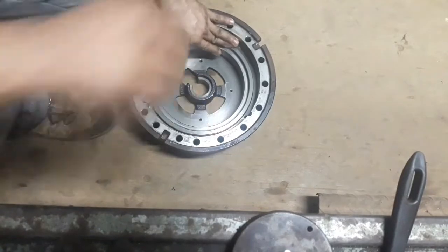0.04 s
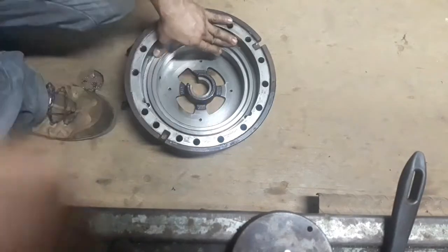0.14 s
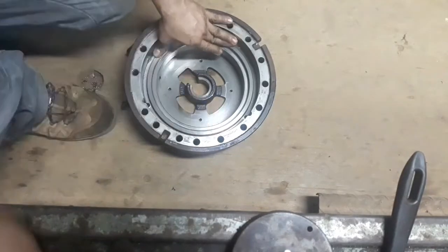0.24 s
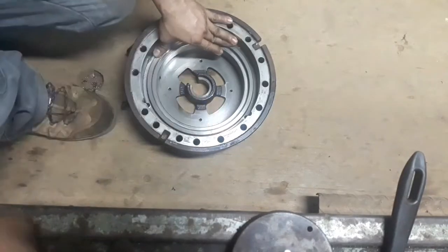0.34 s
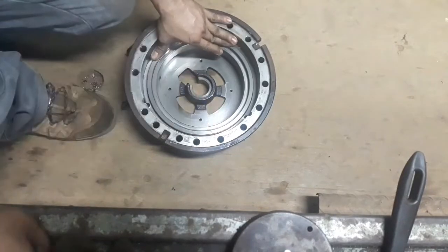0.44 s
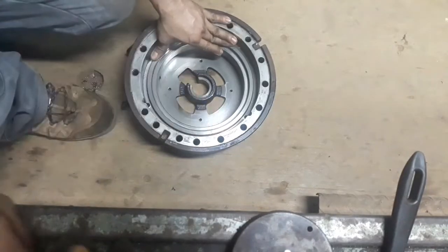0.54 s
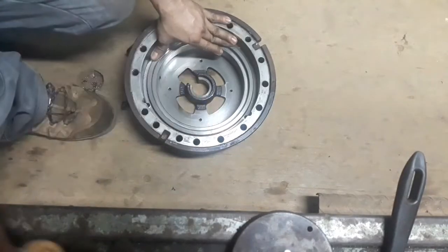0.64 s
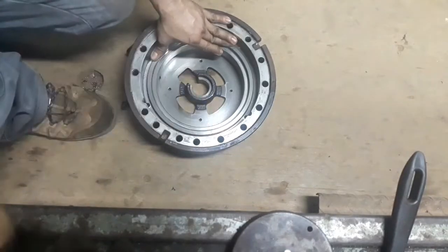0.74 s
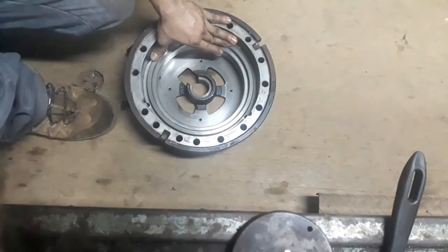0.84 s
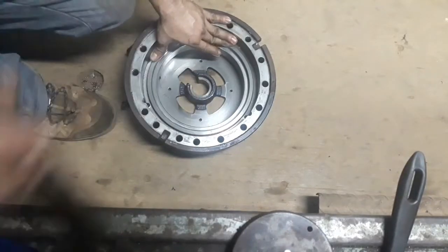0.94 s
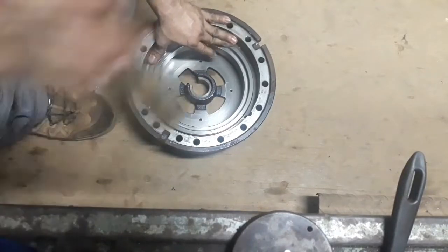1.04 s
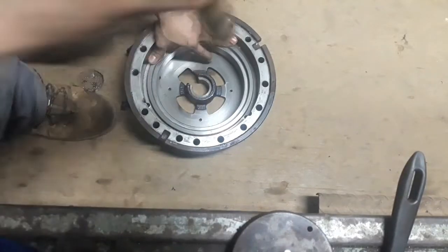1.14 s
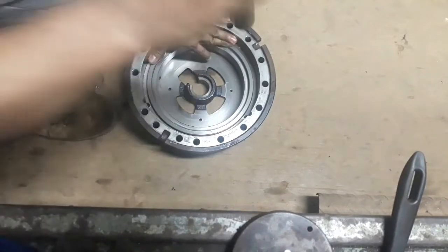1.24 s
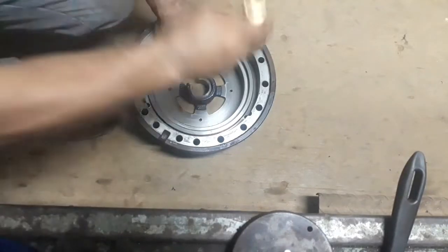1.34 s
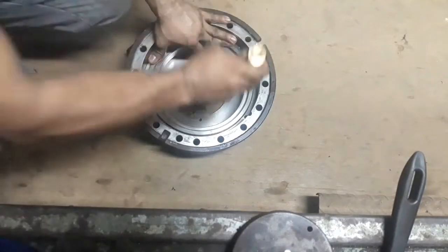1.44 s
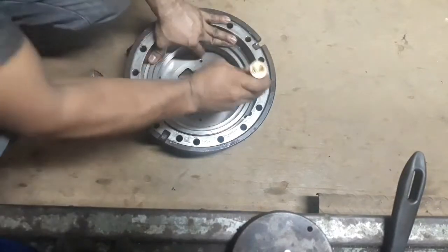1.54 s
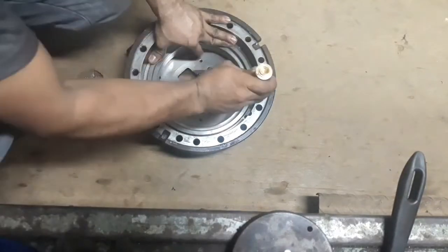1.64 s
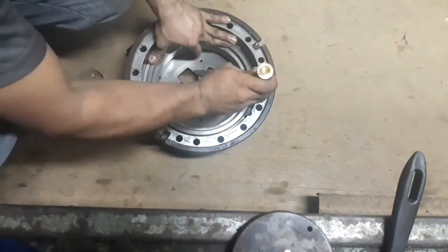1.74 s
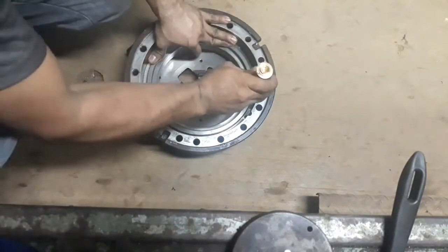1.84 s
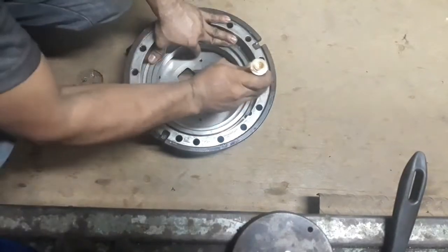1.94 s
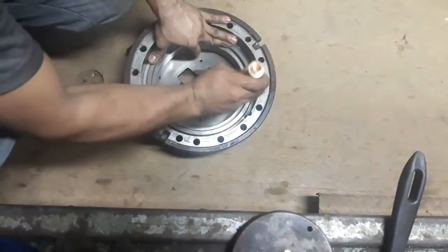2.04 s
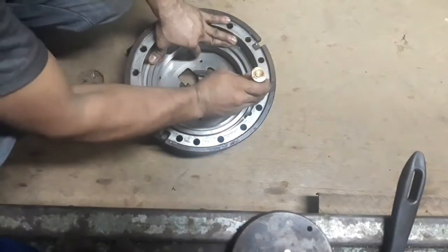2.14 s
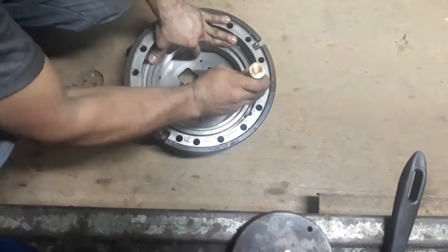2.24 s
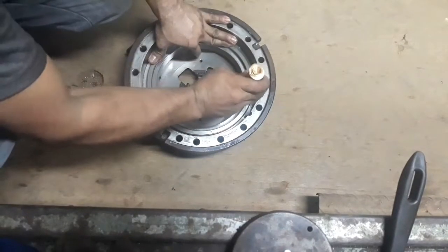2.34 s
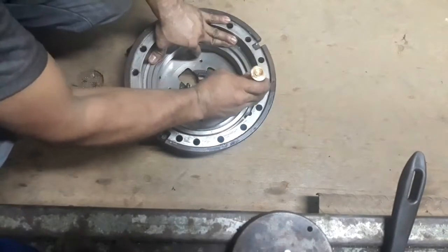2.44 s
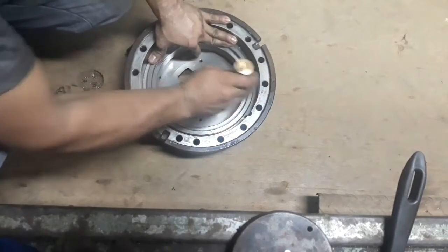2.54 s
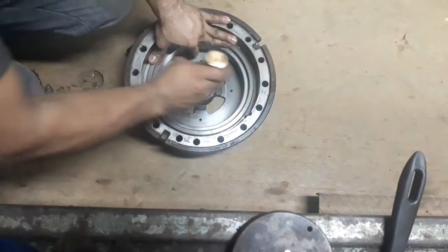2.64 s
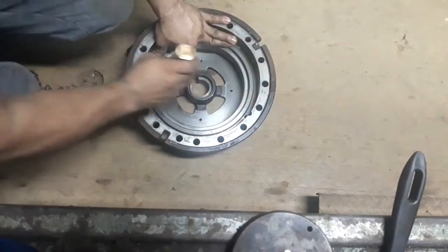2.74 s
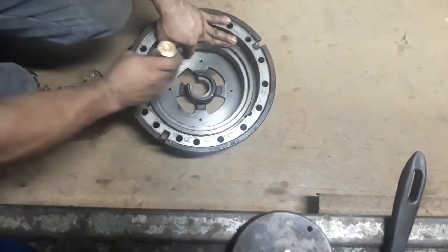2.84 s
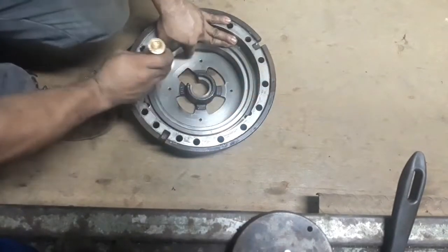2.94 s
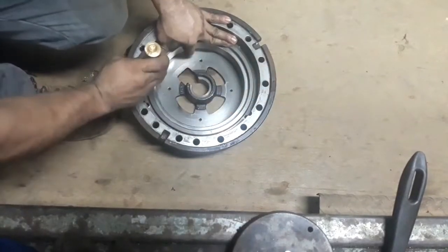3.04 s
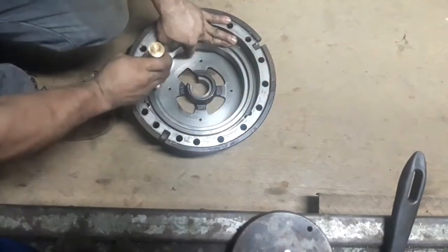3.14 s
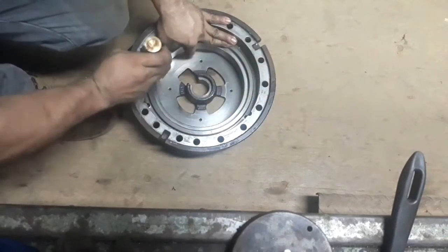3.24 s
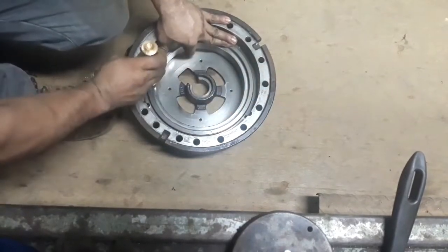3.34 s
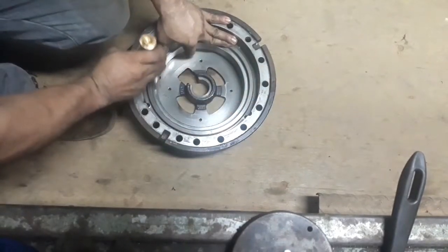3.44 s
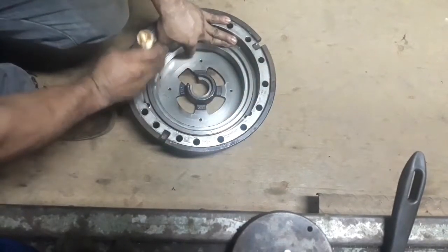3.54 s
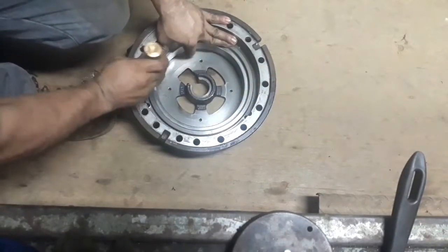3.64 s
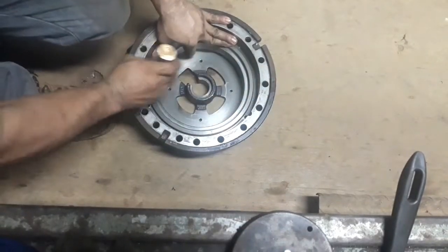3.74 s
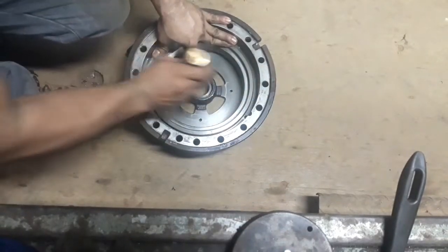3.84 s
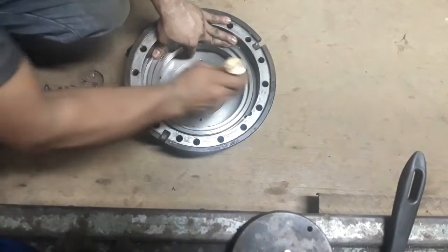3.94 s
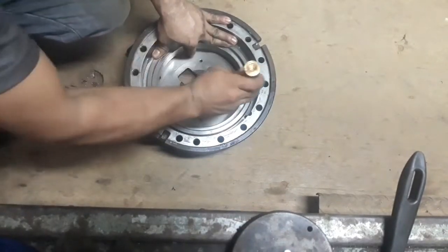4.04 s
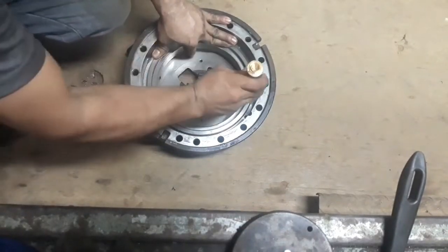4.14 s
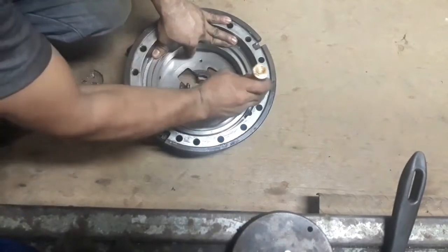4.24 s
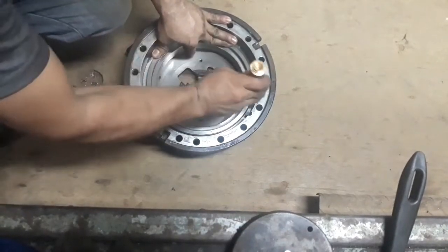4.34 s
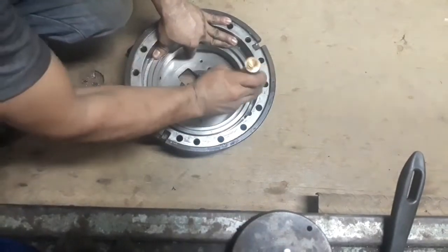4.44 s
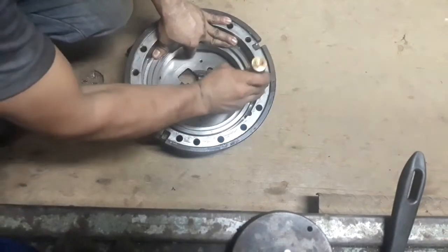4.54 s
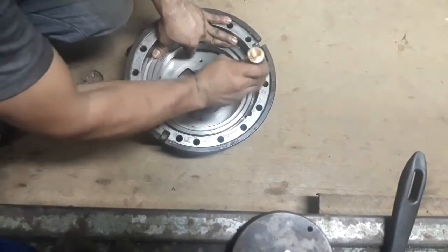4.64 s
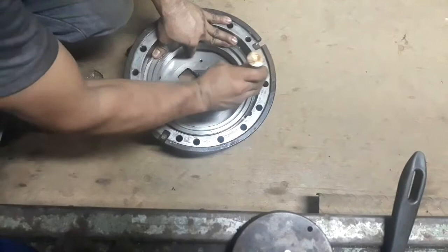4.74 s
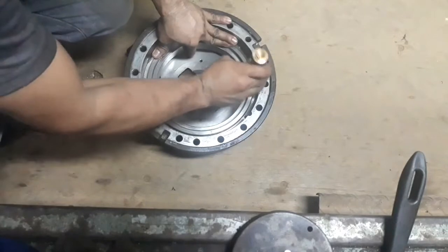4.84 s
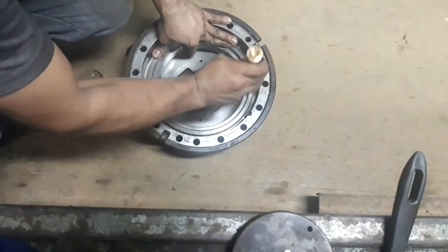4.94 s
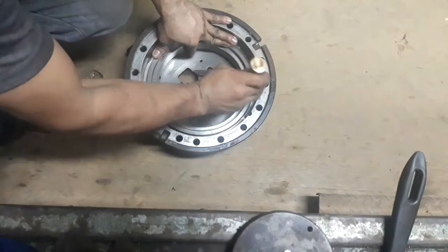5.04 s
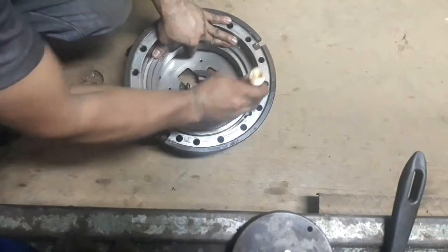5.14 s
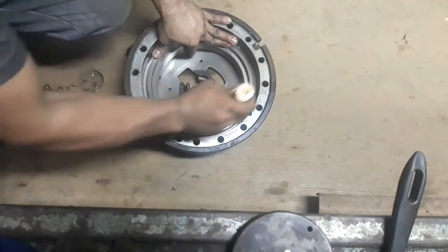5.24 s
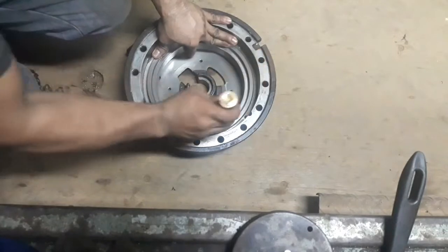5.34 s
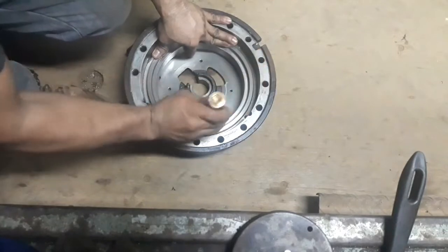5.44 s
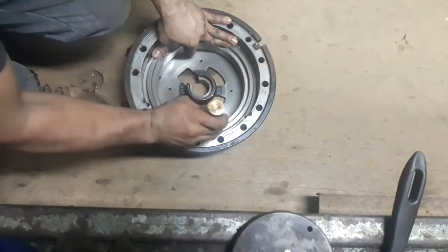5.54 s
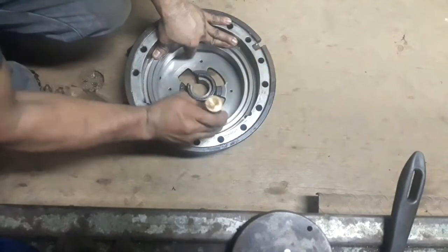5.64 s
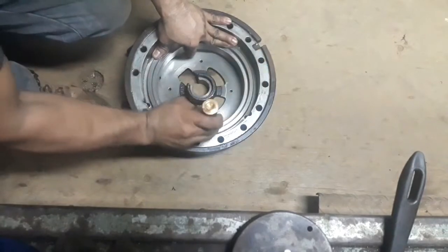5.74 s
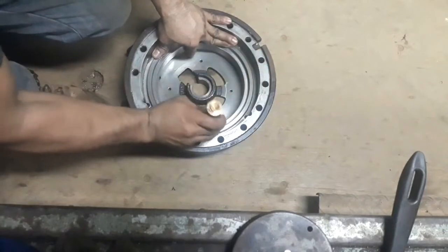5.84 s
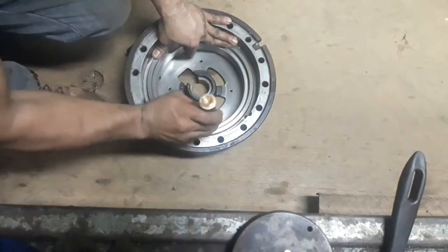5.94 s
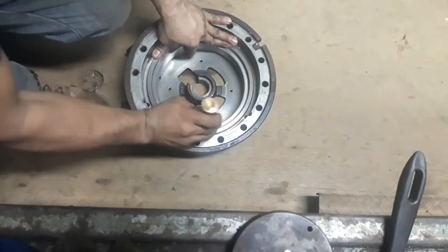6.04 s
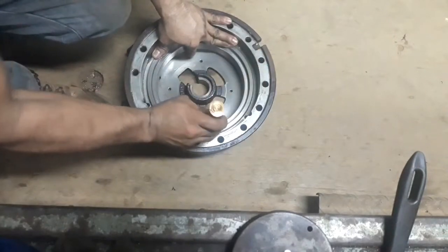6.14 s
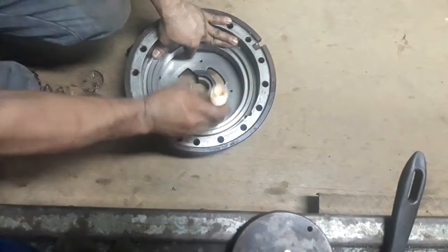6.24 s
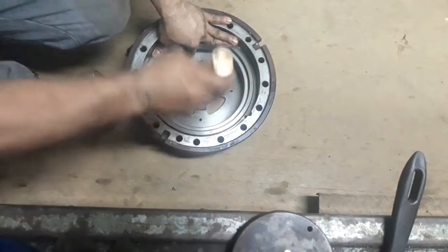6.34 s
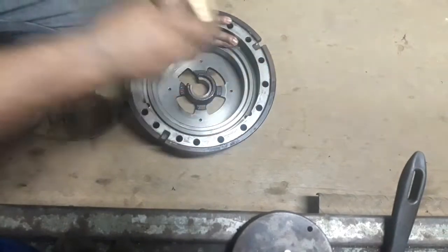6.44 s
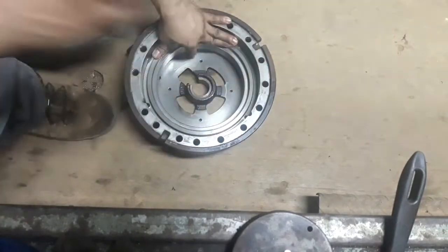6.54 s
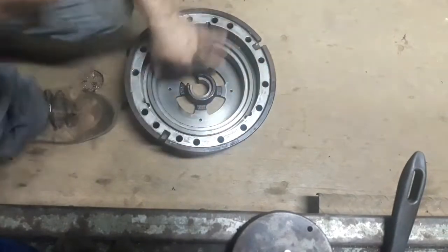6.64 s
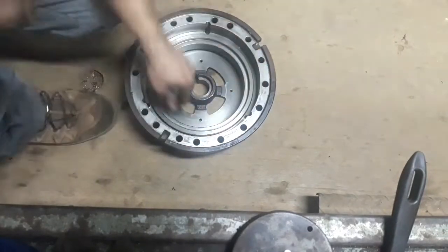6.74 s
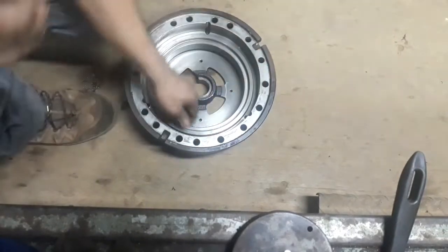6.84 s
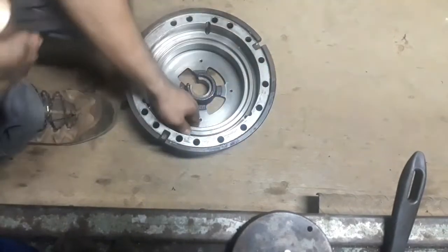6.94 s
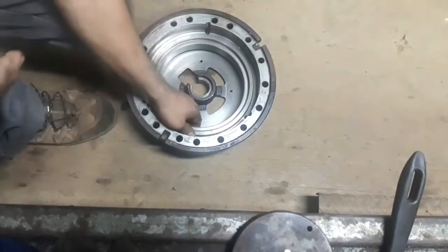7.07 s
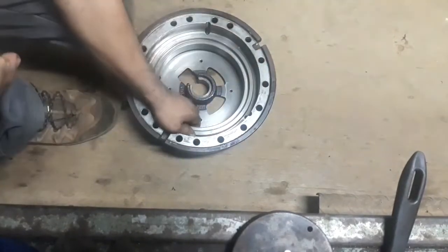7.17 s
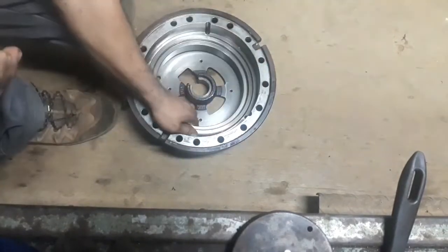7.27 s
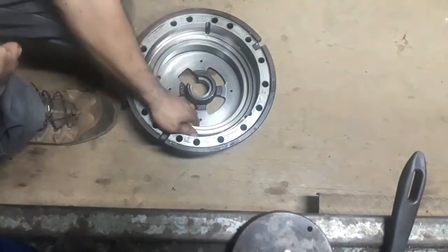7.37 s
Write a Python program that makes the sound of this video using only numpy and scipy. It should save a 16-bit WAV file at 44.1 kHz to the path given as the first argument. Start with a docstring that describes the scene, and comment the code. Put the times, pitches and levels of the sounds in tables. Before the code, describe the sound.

A steady rush of air with a low motor hum opens in a workshop. A small hammer touches a steel wheel softly, then gives two strong, sharp clanks, three more at another spot and a run of lighter taps. Each has a very short ring and a dull thud from the board underneath, with brief room echoes. The fan noise sinks during the tapping and swells back at the end with a faint hand scrape.

```python
"""Sharp clanks with short rings and dull thuds are heard over a rushing, humming fan.
A small brass-headed hammer taps round the rim of a steel wheel that one hand holds down on plywood.
Each tap sums a coloured noise burst, damped modes of the steel and slow modes of the board, with brief echoes.
The fan is coloured noise with wavering sines; it sinks during the tapping and swells back at the end,
as a hand rubs over the wheel with a scrape of uneven noise."""
import sys
import numpy as np
from scipy import signal
from scipy.fft import rfft, irfft
from scipy.io import wavfile
from scipy.ndimage import uniform_filter1d, minimum_filter1d

SR = 44100
rng = np.random.default_rng(int(sys.argv[2]) if len(sys.argv) > 2 else 0)


def master(y):
    """Save y as 16-bit WAV."""
    cut = np.clip(np.atleast_2d(y).T, -1, 1)
    pcm = np.round(cut * 32767)  # scale
    wavfile.write(sys.argv[1], SR, pcm.astype(np.int16))


N = 326594  # length in samples
BLOW_S = 0.5
AGE = np.arange(int(BLOW_S * SR)) / SR  # seconds since a blow

# main rings of the wheel (low, singing, high, top), each a cluster of three close modes:
# pitch_hz, spacing_hz, t60_s
MAIN_RINGS = [(1029.4, 52, 0.076), (3026, 87, 0.072), (4315, 58, 0.092), (7510, 42, 0.039)]
# answer of the wheel at each spot on its rim, levels re the strength, rings before the contact's lift:
# low_ring_db, high_ring_db, top_ring_db, knock_db, favoured_hz, top_treble_db, boom_hz
SPOT_ANSWERS = {"right": (-7.5, -19, -9.5, -13, 1540, -5.5, 170),
                "left": (-9.5, -8.5, -17, -4, 1790, -4, 186),
                "front": (-10, -10, -17.5, -11, 1906, -5.5, 165.5)}


def hammer():
    """Superposition: the soft touch and all taps add up, each from its own start."""
    # blows of the hammer, ring and boom re the strength:
    # start_s, spot, strength_db, contact_brightness_db, singing_ring_db, boom_db, favoured_hz
    taps = [(2.1132, "right", -28, -1.5, -8, -9, 3400), (2.401, "right", -32.5, 4, -25, -11.5, 2660),
            (3.049, "left", -37, -2.5, -5, -4.5, 2800), (3.3463, "left", -31.5, 1.5, -8, -4, 1600),
            (3.6283, "left", -31.5, 4, -22, -4, 2000), (4.2528, "right", -43, -5, -7, -14, 2700),
            (4.5284, "right", -40.5, 2.5, -1.5, -7, 4100), (4.775, "right", -36.5, 8.5, -0.5, -7, 2240),
            (5.0415, "right", -36.5, 8.5, 1, -6, 2580), (5.554, "front", -39.5, 3.5, -6, -11.5, 3560),
            (5.8062, "front", -36, 6, -5, -6, 5050), (6.0639, "front", -36.5, 2, -8, -3, 2500)]
    # the hammer first touches down softly: start_s, low_ring_db, singing_ring_db, boom_db, knock_db
    first_touch = (1.7363, -33, -50, -38.5, -35.5)
    blows = [(first_touch[0], touch(*first_touch[1:]))]
    blows += [(start_s, tap(*blow)) for start_s, *blow in taps]
    out = np.zeros(N + len(AGE))
    for start_s, sound in blows:
        start = int(start_s * SR)
        out[start:start + len(AGE)] += sound
    return out[:N]


def tap(spot, strength_db, bright_db, singing_db, boom_db, favoured_hz):
    """Modal excitation: clank, rings and thud scale with the strength; the spot sets their balance."""
    low_db, high_db, top_db, knock_db, spot_hz, treble_db, boom_hz = SPOT_ANSWERS[spot]
    echoes = room()
    steel = contact(clank((spot_hz, favoured_hz)), bright_db, treble_db)
    tail_db = -10 + 0.36 * bright_db  # a harder contact leaves more echoes
    steel = level(in_room(steel, echoes, tail_db), 3.5)
    ring_levels = (low_db, singing_db, high_db, top_db)
    rings = sum(main_ring(mode, echoes, db) for mode, db in zip(MAIN_RINGS, ring_levels))
    rings = contact(rings, bright_db, treble_db)
    return undb(strength_db) * (steel + rings + thud(boom_db, boom_hz, knock_db))


def touch(low_db, singing_db, boom_db, knock_db):
    """Low-pass excitation: a soft contact at the right wakes only the two lower rings and the board."""
    echoes = room()
    boom_hz = SPOT_ANSWERS["right"][-1]
    low = main_ring(MAIN_RINGS[0], echoes, low_db)
    singing = main_ring(MAIN_RINGS[1], echoes, singing_db)
    return low + singing + thud(boom_db, boom_hz, knock_db)


def clank(favoured_hz):
    """High modal density: a crack spreads into crowded modes, of which spot and blow favour some."""
    # spectrum of the crowded short-lived modes: freq_hz, density_db (per Hz, relative)
    crowd_spectrum = [(60, -40), (400, -11), (780, -5.5), (1250, -1), (1700, 1), (2800, 4), (3600, -2),
                      (5200, -4.5), (6800, -12), (8200, -12.5), (9600, -21.5), (15500, -24.5)]
    # weaker distinct modes of the wheel and hammer head: pitch_hz, level_db (relative), t60_s
    steel_modes = [(1500, -8, 0.088), (1610, -2, 0.059), (1746, 3, 0.084), (1886, 5, 0.088),
                   (2140, -24, 0.12), (2242, 3, 0.17), (2530, 1, 0.22), (2650, -6, 0.24), (3060, 4, 0.17),
                   (3500, -10, .12), (3670, -17, .12), (3940, -7, 0.24), (5300, -16, 0.12),
                   (5370, -6, 0.23), (5700, -6, 0.12), (6230, 6, 0.064), (6660, -24, 0.13),
                   (7900, -0.5, 0.13), (9100, -17, 0.15), (9580, -16, 0.12), (11000, -18, 0.13),
                   (12000, -27, 0.12), (12800, -10, .13)]
    crack = noise(crowd_spectrum, len(AGE)) * fade(0.037)
    # what lingers has lost some of its treble
    dulling = [(3000, -16.5), (7000, -9.5), (14000, -22)]
    lingering = colour(noise(crowd_spectrum, len(AGE)), lambda hz: along(dulling, hz)) * fade(0.18)
    # crowded modes bunch round the distinct ones, driven differently by each blow: (Hz, width Hz, dB)
    bunches = [(mode[0], 70, 6 * rng.random()) for mode in steel_modes]
    bunches += [(hz, 130, 8) for hz in favoured_hz]

    def bunched(hz):
        """Formant-like envelope: the strongest bunch at each frequency sets the gain in dB."""
        return np.max([db * bell(hz, centre, width) for centre, width, db in bunches], axis=0)

    crowd = colour(crack + lingering, bunched) * (1 - np.exp(-AGE / 0.0015))
    return level(crowd, 0) + level(ring(steel_modes, rise_s=0.00083), -12)


def main_ring(mode, echoes, db):
    """Beating: three close damped modes interfere, and the room echoes them."""
    hz, spacing_hz, t60 = mode
    cluster = [(hz - spacing_hz, -3, t60), (hz, 0, t60), (hz + spacing_hz, -4, t60)]
    return level(in_room(ring(cluster, rise_s=0.0038), echoes, -7), db)


def contact(x, bright_db, top_db):
    """Contact time: a harder, shorter contact lifts the treble of what rings; the top follows the brightness
    more steeply but from a lower level set by the spot."""
    top_lift_db = top_db + 1.23 * bright_db
    lift = [(3000, 0), (5000, bright_db), (7500, bright_db), (10000, top_lift_db)]
    return colour(x, lambda hz: along(lift, hz))


def thud(boom_db, boom_hz, knock_db, rise_s=0.0087):
    """Plate resonance: the heavy wheel knocks on the board, whose modes swing up in phase and boom."""
    # modes of the board: multiple (of the boom pitch), level_db (relative), t60_s
    board_modes = [(.82, 1, 0.099), (.97, 3, 0.14), (1.11, -6.5, 0.34), (1.4, -19, 0.13)]
    # dull knock of the wheel on the board: freq_hz, density_db (per Hz, relative)
    knock_spectrum = [(35, -36), (100, 5.5), (260, 1.5), (500, 0), (800, -19.5), (2000, -44)]
    boom = sum(undb(db) * fade(t60) * np.sin(2 * np.pi * boom_hz * multiple * AGE)
               for multiple, db, t60 in board_modes)
    swing = 1 - np.exp(-(AGE / rise_s) ** 2)
    knock = noise(knock_spectrum, len(AGE)) * fade(0.19) * (1 - np.exp(-AGE / 0.0035))
    direct = level(boom * swing, boom_db) + level(knock, knock_db)
    return in_room(direct, room(), -10.5)


def ring(modes, rise_s):
    """Free vibration: damped modes build up over rise_s; each blow shifts pitch slightly, phase at random."""
    out = 0
    for hz, db, t60 in modes:
        detune = 1 + 0.00091 * rng.standard_normal()
        out = out + undb(db) * fade(t60) * np.sin(2 * np.pi * (hz * detune * AGE + rng.random()))
    return out * (1 - np.exp(-AGE / rise_s))


def room():
    """Reverberation: diffuse echoes decay at a rate set by frequency, with distinct reflections among them."""
    # reverberation of the workshop: centre_hz, t60_s
    decay_times = [(150, 0.33), (1000, 0.29), (3000, 0.29), (7000, 0.22), (14000, 0.31)]
    # distinct reflections off floor and wall: delay_s, level_db (re the diffuse echoes)
    reflections = [(0.0134, -13.5), (.040, -12.5)]
    hz = np.fft.rfftfreq(len(AGE), 1 / SR)
    white = np.exp(2j * np.pi * rng.random(len(hz)))
    centres, t60s = np.transpose(decay_times)
    # overlapping bands whose shares sum to one
    bands = (along(np.c_[centres, share], hz) for share in np.eye(len(centres)))
    echoes = sum(irfft(white * band, len(AGE)) * fade(t60) for band, t60 in zip(bands, t60s))
    echoes *= np.clip(AGE / 0.012 - 0.5, 0, 1)  # silent for 6 ms, full at 18 ms
    echoes /= np.sqrt(np.sum(echoes ** 2))
    for delay_s, db in reflections:
        echoes[int((delay_s + 0.001 * rng.random()) * SR)] += undb(db)
    return echoes


def in_room(x, echoes, wet_db):
    """Linear room response: direct sound plus its convolution with the echoes."""
    return x + undb(wet_db) * signal.fftconvolve(x, echoes)[:len(x)]


def rub():
    """Stick-slip friction: skin catches and slips on the steel in an uneven, dull scrape."""
    # one short rub of a hand over the wheel: middle_s, half_length_s, level_db, roughness_db
    hand_rub = (7.5, 0.11, -44.5, 3.5)
    middle_s, half_s, db, rough_db = hand_rub
    swell = bell(np.arange(N) / SR, middle_s, half_s)
    scrape = noise([(300, -15), (1400, 3), (2800, -4), (5000, -22), (10000, -45)], N)
    return undb(db + rough_db * walk(150)) * swell * scrape


def fan():
    """Turbulence and motor tones: rushing air and wavering lines; the background drops during the tapping, then
    swells back."""
    # rush of the air: freq_hz, density_db (per Hz, relative)
    air_spectrum = [(25, -16), (48, -12.5), (80, -3), (150, -2), (300, 0), (420, -6.5), (560, -3),
                    (700, -9.5), (1000, -9), (1300, -10.5), (3000, -14.5), (5200, -19), (6300, -24.5),
                    (8300, -24.5), (9800, -36.5), (15500, -40)]
    # hum of the motor: pitch_hz, level_db (rms before the sinking and swelling), waver_rad
    hum_lines = [(80, -55, 0.33), (150.9, -52.5, 1), (299.4, -48, 1.4), (543, -54, 2.47),
                 (612.7, -54.5, 1.36), (803, -54.5, 1.6), (974, -53.5, 1.66), (1496, -65, 2.4)]
    # course of the background, used relative to its highest point: time_s, level_db
    sinking = [(0.0, -36), (0.55, -36.5), (1.98, -36), (2.75, -46.5), (3.54, -47), (3.99, -51.5),
               (4.83, -50), (4.96, -49), (5.56, -50.5), (7.1, -50)]
    t = np.arange(N) / SR
    air = undb(-36.0 + 0.38 * walk(7.3)) * noise(air_spectrum, N)
    hum = 0
    for hz, db, waver in hum_lines:
        amplitude = np.sqrt(2) * undb(db + 0.87 * walk(6.5))
        hum = hum + amplitude * np.sin(2 * np.pi * hz * t + waver * walk(20))
    sink_db = np.interp(t, *np.transpose(sinking))
    return_s, rise_s, gain_db = 7.2, 0.13, 8.5  # the swell back
    return_db = gain_db * np.clip((t - return_s) / rise_s, 0, 1)
    return (air + hum) * undb(sink_db - sink_db.max() + return_db)


def undb(db):
    """Logarithmic level: decibels to amplitude gain."""
    return 10 ** (np.asarray(db) / 20)


def along(points, hz):
    """Log-frequency scale: read (Hz, value) points between their corners."""
    f, value = np.transpose(points)
    return np.interp(np.log(np.maximum(hz, 1)), np.log(f), value)


def noise(spectrum, size):
    """Spectral shaping: white noise takes the given colour, at rms 1."""
    gain = undb(along(spectrum, np.fft.rfftfreq(size, 1 / SR)))
    x = irfft(rfft(rng.standard_normal(size)) * gain, size)
    return x / x.std()


def colour(x, db_at):
    """Minimum phase: a filter of gain db_at(Hz) under which nothing sounds before its cause."""
    size = 2 * len(x)
    log_gain = np.log(undb(db_at(np.fft.rfftfreq(size, 1 / SR))))
    cepstrum = irfft(log_gain, size)
    # fold the cepstrum onto positive time to make the filter causal
    cepstrum[1:len(x)] *= 2
    cepstrum[len(x) + 1:] = 0
    return irfft(rfft(x, size) * np.exp(rfft(cepstrum)), size)[:len(x)]


def bell(x, centre, width):
    """Gaussian curve: a smooth bump of height 1."""
    return np.exp(-((x - centre) / width) ** 2)


def fade(t60):
    """Exponential damping: 60 dB down after t60 seconds."""
    return np.exp(-np.log(1000) * AGE / t60)


def level(x, db):
    """Onset level: set the rms of the first 50 ms of a blow."""
    return x * undb(db) / np.sqrt(np.mean(x[:SR // 20] ** 2))


def walk(rate):
    """Band-limited chance: random steps, rate per second, smoothed to a spread near 1."""
    k = int(SR / rate)
    steps = np.repeat(rng.standard_normal(N // k + 1), k)
    return 1.3 * uniform_filter1d(uniform_filter1d(steps, k), k)[:N]


def scene():
    """Superposition: hammer, rub and fan add up to one signal, the same in both channels."""
    return np.tile(hammer() + rub() + fan(), (2, 1))


def record(dry):
    """Peak limiting and band-pass: a fast limiter holds down the taps; lowest bass and top are cut."""
    ceiling, hold = undb(-17.5), SR // 250  # hold of 4 ms, in samples
    needed = ceiling / np.maximum(np.abs(dry), ceiling)
    limited = dry * uniform_filter1d(minimum_filter1d(needed, hold), hold)
    bass_cut = signal.butter(3, 42, "high", fs=SR, output="sos")
    top_cut = signal.ellip(10, 0.2, 70, 15800, fs=SR, output="sos")
    return signal.sosfilt(top_cut, signal.sosfilt(bass_cut, limited))


dry = scene()
out = record(dry)
master(out)
```